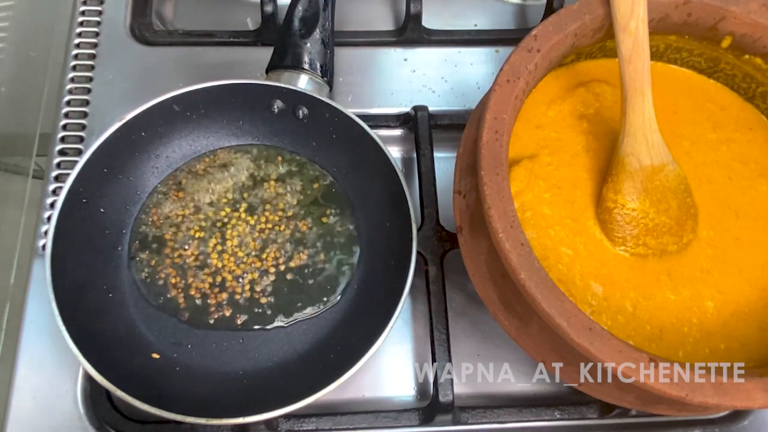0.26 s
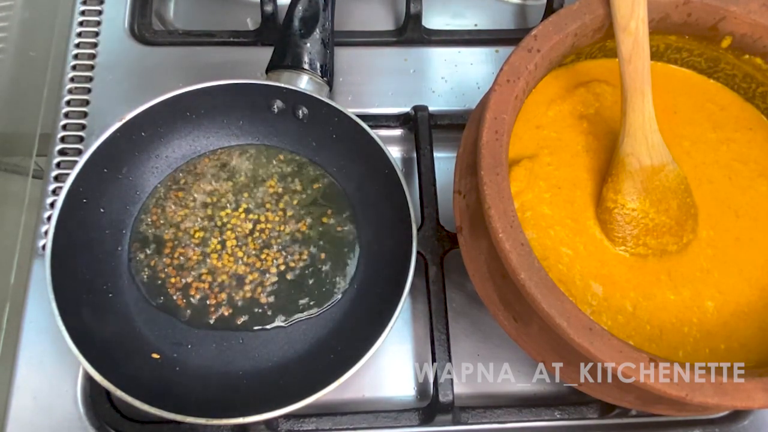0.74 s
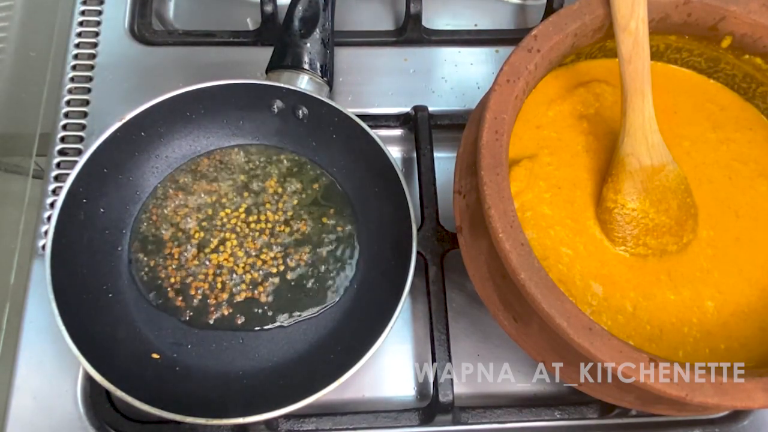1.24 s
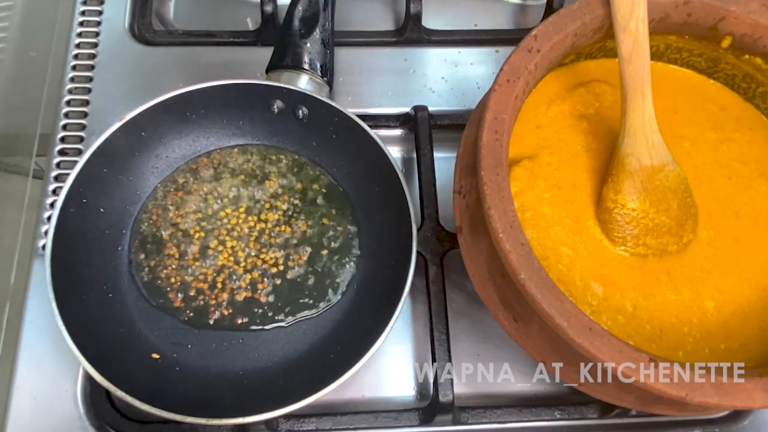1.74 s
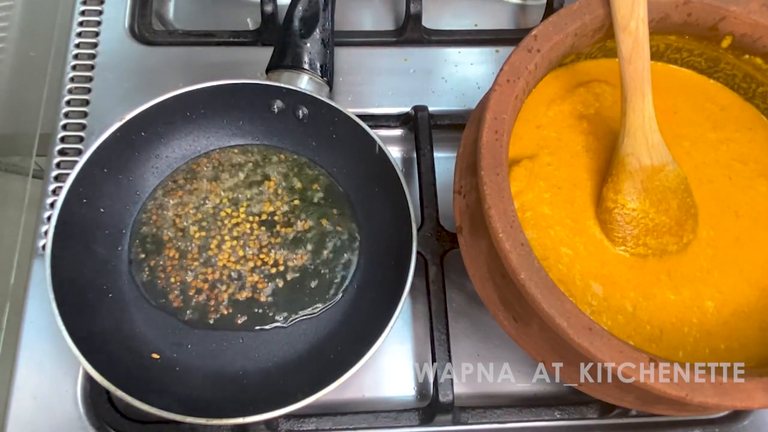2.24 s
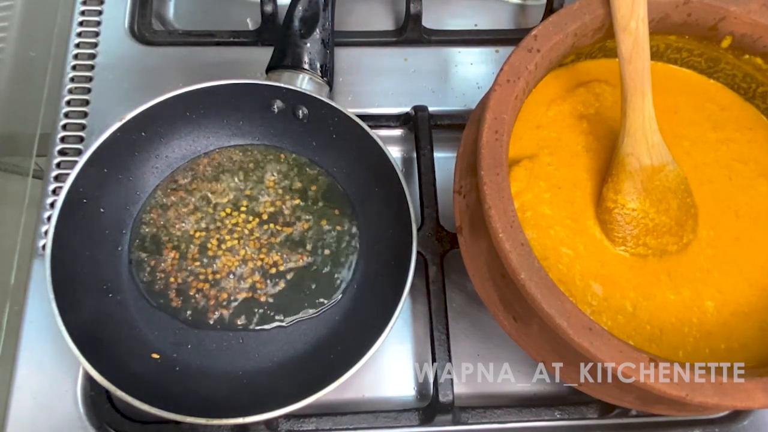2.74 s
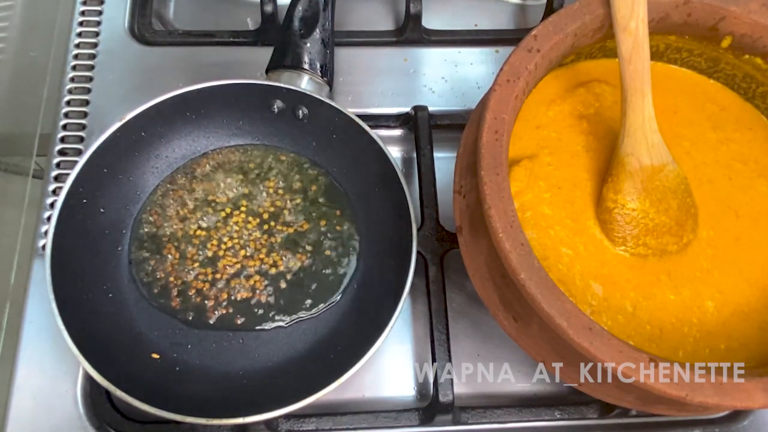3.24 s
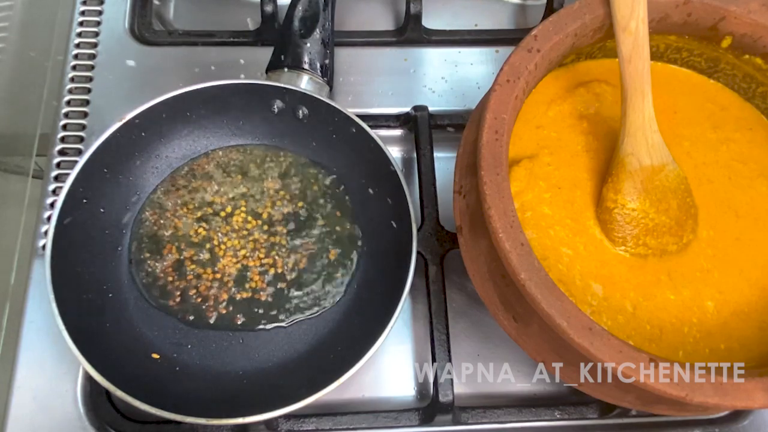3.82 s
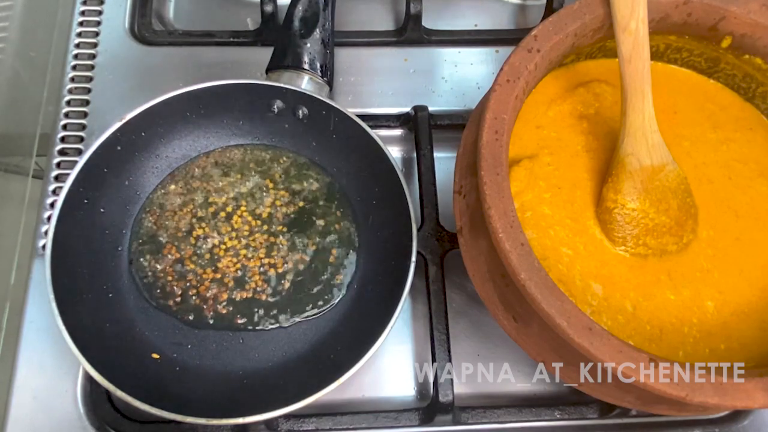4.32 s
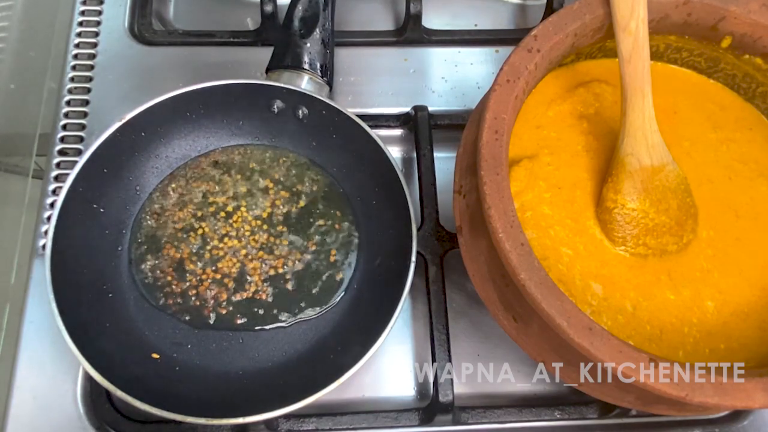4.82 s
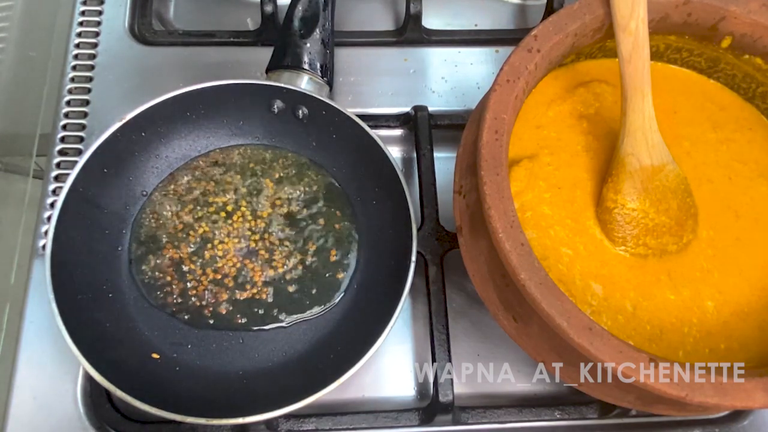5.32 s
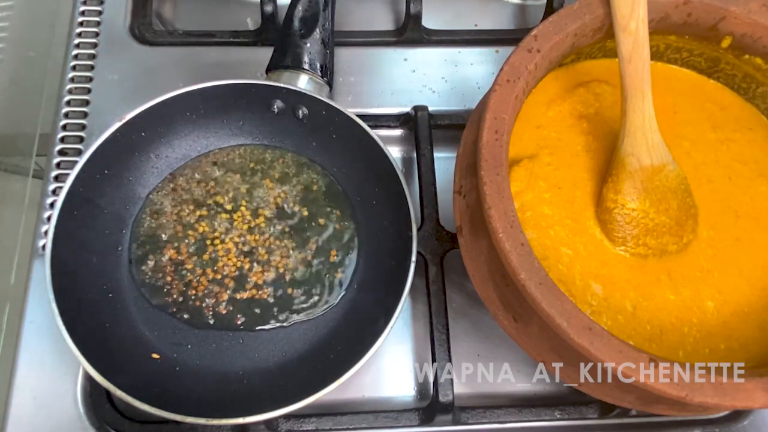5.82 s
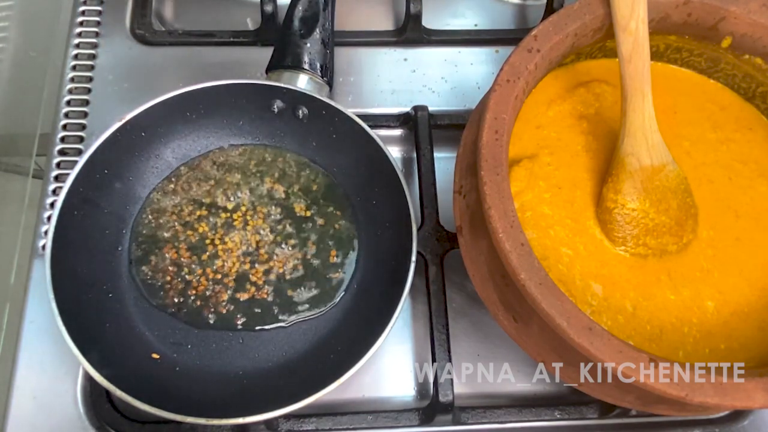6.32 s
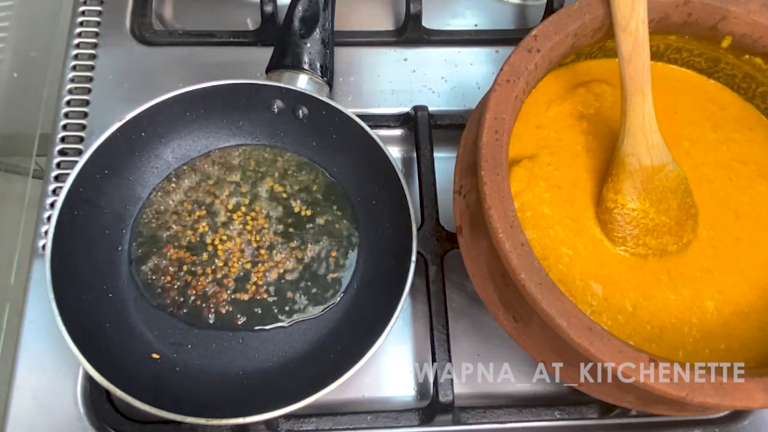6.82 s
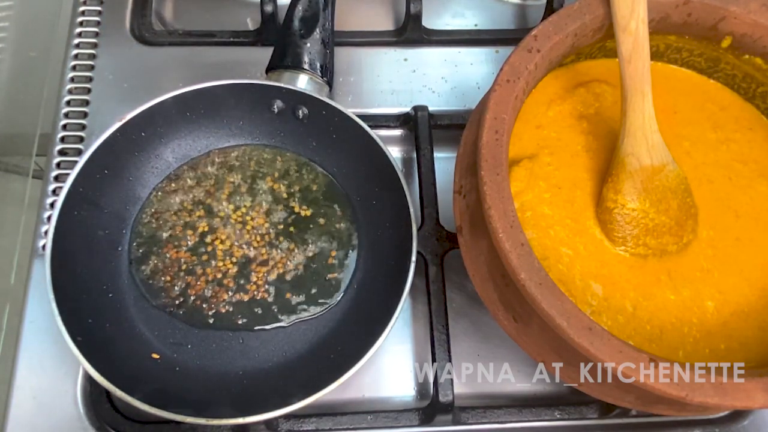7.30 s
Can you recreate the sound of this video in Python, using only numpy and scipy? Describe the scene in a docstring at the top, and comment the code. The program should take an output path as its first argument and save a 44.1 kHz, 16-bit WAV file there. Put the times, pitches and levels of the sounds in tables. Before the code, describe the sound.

Mustard seeds splutter in hot ghee in a small pan, irregular sharp pops and crackles over a fine sizzle and faint gas flame roar.

```python
"""Mustard seeds spluttering in hot ghee

A small frying pan on a gas hob, heard close up through a phone in a kitchen.
Seeds burst with sharp noise cracks that ring the pan's modes; puffs of air are low swings that sag in pitch.
Flung bits land with pitched ticks. The fat sizzles as hiss plus grains, stirred for a moment by larger bursts.
Shaped noise makes the burner's soft roar, and the room adds a short bright tail.
Now and then the low end thins out and comes back."""
import sys
import numpy as np
from scipy import signal
from scipy.fft import rfft, irfft
from scipy.io import wavfile
from scipy.ndimage import uniform_filter1d

SR = 44100
rng = np.random.default_rng(int(sys.argv[2]) if len(sys.argv) > 2 else 0)


def wav_out(sig):
    """Save sig, one row per channel (or a flat mono array), as 16-bit PCM at SR to the path in sys.argv[1]."""
    wavfile.write(sys.argv[1], SR, np.round(np.clip(np.atleast_2d(sig).T, -1, 1) * 32767).astype(np.int16))


N = 333197
TIME = np.arange(N) / SR  # s
HIT = np.arange(int(.04 * SR)) / SR  # clock of one short sound, s
MS = SR / 1000  # samples in a millisecond


# layers of a burst re its crack level, before its brightness tilts them; send to the room
BODY_DB, TOP_DB, POP_ROOM_DB = -7.5, 2, -5


def pops(low_db=-8, lead_s=.0004, dull_db_per_octave=32, air_db=-3, sheen_db=-4):
    """Seed coats split with a crack and ring the pan; returns the near sound and the send to the room."""
    near, far = np.zeros((2, 2, N))
    for s, db, bright_db, pan_db, ring_db in seeds():
        body_db, top_db = BODY_DB - bright_db, TOP_DB + bright_db
        body = crack(2470, 4410, decay_s=0.00034, alike=0.047)
        low = undb(low_db) * crack(846, 2620, decay_s=0.00018, alike=0.083)
        # a slower burst loses its top, and its snap sits lower too
        snap_hz = max(9000 * 2 ** (min(top_db, 0) / dull_db_per_octave), 5600)
        snap = crack(4610, snap_hz, decay_s=0.00057, alike=0.51)
        sheen = crack(9000, 12000, decay_s=.0003, alike=.7, rise_s=.0003, scatter_db=-22)
        air = crack(12500, 16500, decay_s=.0003, alike=.7, rise_s=.0003, scatter_db=-22)
        top = undb(sheen_db) * sheen + undb(air_db) * air
        # the middle of the spectrum favours one microphone; the top reaches both alike
        middle = (low + undb(body_db) * body + snap) * sides(pan_db)
        burst = middle + undb(top_db) * top
        add(near, s - lead_s, undb(db) * burst)
        add(near, s, undb(db + ring_db) * pan_ring())
        add(far, s - lead_s, undb(db + POP_ROOM_DB) * burst)
    return near, far


# larger bursting seeds: (time [s], crack level [dB], brightness [dB], left minus right [dB],
# pan ring re crack [dB]); brightness lifts the top and lowers the body by as much
BURSTS = [(0.234, -17, -0.5, 5, -28), (0.4563, -30.5, -1.5, 8, -23), (0.7646, -14.5, -1, 0, -21),
          (0.8053, -22.5, -1.5, 4, -14), (0.865, -28, 3, 4, -25), (1.0245, -18.5, -2, 2, -28),
          (1.1812, -23.5, 5.5, 6, -21), (1.3019, -29.0, -4.5, 8, -31), (1.355, -24, -8.5, 8, -11),
          (1.4275, -18.5, -7, 8, -11.5), (1.6497, -27.5, -3.5, 6, -19), (1.7512, -19, 3.5, 1, -32),
          (1.7813, -14.5, -1, 6, -25), (1.8885, -18, 1.5, 2, -37), (1.9604, -20.5, -0.5, 2, -15.5),
          (2.0107, -16, 0, 5, -35), (2.0921, -20.5, -0.5, 6, -14), (2.226, -20, 2, 2, -22),
          (2.2564, -21.5, -1, 8, -25), (2.2952, -25, -1.5, 4, -28), (2.5593, -19.5, 1, 11, -11.5),
          (2.6131, -28, -6.5, 4, -13), (2.7314, -22, 1.5, 11, -42), (3.0584, -27, 4, 11, -15),
          (3.436, -24, 2, 5, -22), (3.4906, -22.5, 5, 4, -37), (3.6183, -32, 3, 2, -30),
          (3.629, -26, 6, 2, -34), (3.714, -14.5, 1, -2, -20.5), (3.8801, -20.0, 4.5, 16, -12.5),
          (3.9065, -27, -9.5, 2, -21), (4.1322, -14, -1.5, 0, -16.5), (4.455, -23.5, -8, 5, -22.5),
          (4.8702, -26.5, -3.5, 3, -21), (5.017, -25, 4.5, -4, -23), (5.028, -22, -1, 4, -30),
          (5.1404, -26.5, 0.5, 1, -35), (5.3344, -19, 0.5, 3.5, -34), (5.474, -15.5, 2, 2, -23.5),
          (5.5193, -26, 2, 4, -36), (5.676, -29.5, 1, 5, -38), (5.77, -14.5, 0.5, 8.5, -42),
          (6.0595, -16.5, -11, 5, -19), (6.159, -23, -6.5, 2, -35), (6.211, -30.5, -14.5, 2, -28),
          (6.2274, -16.5, -9, 9, -25), (6.2685, -20.5, -1.5, 13, -27), (6.3037, -29, -12, 8, -23),
          (6.336, -25.5, 1, 1, -33), (6.4188, -26.5, 7, 6, -28), (6.5571, -23, 2.5, 0.5, -30),
          (6.78, -28, -11.5, -1, -17), (7.0018, -19, 4.5, 2, -32), (7.0562, -27.0, 0, 6, -25),
          (7.0801, -28, 3.5, 1, -28), (7.1446, -19, 0, 7, -22)]
# the smallest seeds: rate, mean level, largest scatter either way, pan ring re crack
SMALL_PER_S, SMALL_DB, SMALL_SPREAD_DB, SMALL_RING_DB = 2.2, -41, 4, -15.5


def seeds():
    """Larger seeds burst on cue and the smallest at random times; one row per burst."""
    count = int(SMALL_PER_S * N / SR)
    moment, size, bright, place = rng.random((count, 4)).T
    level = SMALL_DB + SMALL_SPREAD_DB * (2 * size - 1)
    small = [moment * N / SR, level, 6 * bright, 10 * place, np.full(count, SMALL_RING_DB)]
    return np.vstack([BURSTS, np.transpose(small)])


# resonant modes of the pan: (frequency [Hz], level [dB], decay by 60 dB [s])
PAN_MODES = [(684, -6, .13), (1110, -1, .11), (1965, 0, .13), (2751, -15, .1), (4134, -13, .09),
             (4398, -9, .1), (5066, -11, .1)]


def pan_ring(spread_db=2):
    """The pan's modes; each burst sits somewhere else and weights them anew."""
    t = np.arange(SR // 4) / SR
    hz, db, t60 = np.transpose(PAN_MODES)[:, :, None]
    gains = undb(db + spread_db * rng.standard_normal((len(PAN_MODES), 1)))
    phase = rng.uniform(0, 2 * np.pi, (2, len(PAN_MODES), 1))
    decay = np.exp(-np.log(1000) * t / t60)
    return np.sum(gains * decay * np.sin(2 * np.pi * hz * t + phase), axis=1)


def crack(lo_hz, hi_hz, decay_s, alike, rise_s=0.00063, scatter_db=-18, scatter_s=0.0028):
    """A split-second noise burst in one band, trailed by its scatter off the pan wall and hob."""
    rise = (1 - np.exp(-HIT / rise_s)) ** 2
    fall = np.exp(-HIT / decay_s) + undb(scatter_db) * np.exp(-HIT / scatter_s)
    return blow(band(pair(len(HIT), alike) * rise * fall, lo_hz, hi_hz))


# flung seeds and drops landing: (time [s], ring level [dB], ring pitch [Hz], click re ring, before trim [dB])
LANDINGS = [(0.3333, -13, 2730, -5.5), (0.693, -23.5, 2810, -10), (0.849, -26, 2760, -20),
            (0.9055, -18.5, 2880, -0.5), (1.065, -31.5, 2690, -5), (1.1948, -20.5, 2650, 1),
            (1.324, -23.5, 2720, -10), (1.3921, -14.5, 2895, -4.5), (1.477, -15.5, 2810, -28),
            (1.5878, -17.5, 2770, -15), (2.2316, -20.5, 2850, -16), (2.3527, -16.5, 2830, -16),
            (2.5306, -16.5, 2840, -10), (2.915, -22, 2830, -2.5), (3.0688, -19.5, 2830, -12),
            (3.6073, -30, 3340, 0), (3.8898, -20, 2890, -6), (3.9138, -24, 2740, -13),
            (4.2292, -21.5, 2530, -27), (4.2603, -16, 3010, -5.5), (5.2597, -30, 2840, -19),
            (6.4934, -27.5, 3090, -1), (7.4604, -25, 2920, -16)]


def ticks(swell_s=0.0015, upper_ratio=1.213, upper_db=-11, knock_db=-4, lag_s=0.0001, pan_db=5):
    """Small landings: a click, then a damped ring of a few cycles with a weaker partial above."""
    out = np.zeros((2, N))
    t = HIT - np.array([[0], [lag_s]])  # the ring's phase lags on the right
    shape = HIT * np.exp(-HIT / swell_s)
    for s, db, hz, click_db in LANDINGS:
        phase = rng.uniform(0, 2 * np.pi, 2)
        ring = blow(shape * np.sin(2 * np.pi * hz * t + phase[0]))
        partial = blow(shape * np.sin(2 * np.pi * hz * upper_ratio * t + phase[1]))
        knock = undb(knock_db) * crack(2060, 4770, decay_s=0.00057, alike=0.022)
        click = undb(-1.5) * crack(2660, 12300, decay_s=0.0012, alike=0.16)
        click = click + undb(-17.5) * crack(6300, 12500, decay_s=0.0008, alike=1.0)
        landing = ring + undb(upper_db) * partial + knock + undb(click_db) * click
        add(out, s, undb(db) * landing * sides(pan_db))
    return out


# large puffs of steam that blow straight at the microphones: (time [s], level [dB], starting pitch [Hz])
STEAM_PUFFS = [(0.8061, -30.5, 600), (0.8684, -21, 380), (1.782, -26, 410), (3.4377, -29, 626),
               (3.6315, -22, 533), (3.7163, -23, 357), (5.3354, -15, 346), (5.7724, -27.5, 500),
               (6.4209, 5.5, 426), (6.4963, -18.5, 277), (6.511, -26.5, 298)]
# every larger burst also pushes a little air: level re the crack, starting pitch
PUFF_DB, PUFF_HZ = -19, 648


def puffs(sag_cycles=1.4, rise_cycles=0.16, decay_cycles=1.57, wake_db=-26, wake_cycles=7,
          lag_s=0.00017, after_s=0.00092):
    """One push of air or steam swings back ever more slowly, reaching the left microphone first."""
    out = np.zeros((2, N))
    small = [(s + after_s, db + PUFF_DB, PUFF_HZ) for s, db, *_ in BURSTS]
    for s, db, hz in list(STEAM_PUFFS) + small:
        age = hz * np.maximum(HIT - np.array([[0], [lag_s]]), 0)  # in starting cycles
        swing = -np.sin(2 * np.pi * sag_cycles * np.log1p(age / sag_cycles))
        rise = 1 - np.exp(-age / rise_cycles)
        fall = np.exp(-age / decay_cycles) + undb(wake_db) * np.exp(-age / wake_cycles)
        fade = 1 - (HIT / HIT[-1]) ** 2
        add(out, s - lag_s / 2, undb(db) * blow(swing * rise * fall * fade) * sides(6.2))
    return out


# spectrum of the sizzle: (frequency [Hz], relative level [dB per Hz])
FAT_SPECTRUM = [(1800, -8), (2700, 2), (4000, -3), (5200, 0), (8000, 2.5), (11000, 6), (12500, -1.5),
                (14000, 3.5), (15300, 11), (16500, -33)]


def sizzle(per_s=450, spread_db=10, grain_db=-7, hiss_db=0):
    """Countless tiny steam bubbles merge into a hiss; the larger ones stand out as grains."""
    bigness = np.minimum(rng.exponential(size=N), 4)
    sizes = undb(spread_db * bigness) * (rng.random(N) < per_s / SR)
    grains = pair(N, 1.0) * signal.fftconvolve(sizes, np.exp(-HIT / 0.0014))[:N]
    hiss = pair(N, 0.4) * undb(2.6 * walk(40))
    fat = undb(hiss_db) * unit(colour(hiss, FAT_SPECTRUM))
    fat = fat + undb(grain_db) * unit(colour(grains, FAT_SPECTRUM))
    return fat * boil() * sides(1.0)


# the boil without its flares: (time [s], level [dB])
STEADY_BOIL = [(0, -44.5), (0.6, -51.5), (2.0, -46.5), (3.4, -51), (5.6, -48.5), (6.4, -51), (7.56, -50)]
# each larger burst stirs the fat: flare level re the crack, settling time
STIR_DB, SETTLE_S = -37, 0.2


def boil():
    """Strength of the sizzle: the underlying boil plus a flare that settles after each larger burst."""
    kicks = np.zeros(N)
    for s, db, *_ in BURSTS:
        kicks[int(s * SR)] += undb(db + STIR_DB) ** 2
    stirred = signal.lfilter([1], [1, -np.exp(-2 / (SETTLE_S * SR))], kicks)  # power
    steady = undb(np.interp(TIME, *np.transpose(STEADY_BOIL)))
    return np.sqrt(steady ** 2 + stirred)


# course of the flame's low rumble, before its trim and flutter: (time [s], level [dB])
RUMBLE_LEVEL = [(0, -54), (2.2, -53.5), (2.8, -64.5), (3.35, -57.5), (3.9, -60.5), (5.8, -59), (6.3, -60.5),
                (6.9, -64), (7.56, -69)]
# spectra of the rumble, the roar and its upper part: (frequency [Hz], relative level [dB per Hz])
RUMBLE_SPECTRUM = [(20, -41), (45, -1.5), (110, -2.5), (190, 2), (280, -4), (450, -15), (800, -5)]
ROAR_SPECTRUM = [(150, -17), (350, -4.5), (580, -4.5), (820, -7.5), (1080, 9), (1320, -2), (1500, 4.5),
                 (1750, -4.5), (2200, -59)]
UPPER_SPECTRUM = [(1300, -4.5), (1800, -6), (2300, 1), (2800, -14), (4000, -8)]
# the air gap under the pan sings in the flame: (frequency [Hz], width [Hz], level re roar [dB])
GAP_TONE = (687, 8.1, -3.5)


def burner(rumble_db=1, roar_db=-51.5, upper_db=-7):
    """The gas flame flutters and roars as shaped noise, with a narrow-band tone under the pan."""
    low = undb(np.interp(TIME, *np.transpose(RUMBLE_LEVEL)))
    hz, width, tone_db = GAP_TONE
    tone = undb(tone_db) * unit(band(pair(N, 0.022), hz - width / 2, hz + width / 2, order=1))
    flutter = undb(2 * walk(20))
    rumble = unit(colour(pair(N, 0.89), RUMBLE_SPECTRUM)) * undb(rumble_db) * flutter
    roar = unit(colour(pair(N, 0.025), ROAR_SPECTRUM))
    roar = roar + undb(upper_db) * unit(colour(pair(N, 0.048), UPPER_SPECTRUM))
    roar_gain = undb(roar_db + 1.4 * walk(8.6))
    return low * rumble + (roar + tone) * roar_gain * sides(3.1)


# spectrum of the room's tail: (frequency [Hz], relative level [dB per Hz])
ROOM_SPECTRUM = [(200, -32), (900, -7), (2000, 9.5), (3000, 8), (5000, 8), (8000, 6.5), (12000, 0.5),
                 (16000, -34)]
# decay by 60 dB, level of the tail
ROOM_T60_S, ROOM_DB = .34, -10


def kitchen(x, first_s=0.0036):
    """Tiles and hob throw back a short, dense tail, different for each direction and each microphone."""
    t = np.arange(SR // 2) / SR
    fade = np.exp(-np.log(1000) * t / ROOM_T60_S) * np.minimum(t / first_s, 1) ** 2
    out = 0
    for direction in x:
        tail = colour(rng.standard_normal((2, len(t))), ROOM_SPECTRUM) * fade
        tail = tail / np.sqrt(np.sum(tail ** 2, axis=1, keepdims=True))
        out = out + signal.fftconvolve(direction[None], tail, axes=1)[:, :N]
    return undb(ROOM_DB) * out


# the low end thins out and comes back: (start [s], climb of the edge [s], hold [s], recovery [s],
# highest edge [Hz], depth [dB])
LOW_DIPS = [(0.856, 0.073, 0.11, 0.052, 1980, -3.5), (1.29, 0.068, 0.066, 0.29, 330, -20),
            (1.964, 0.24, 0.23, 0.59, 2420, -22.5), (2.544, .05, 0.32, 0.2, 110, -19),
            (3.477, 0.1833, .04, 0.021, 810, -19), (5.54, 0.27, 0.15, .03, 2480, -5.5),
            (6.069, 0.05, 0.38, 0.3, 1760, -4.5), (6.66, 0.16, 0.81, .1, 110, -10)]
# time for a dip to reach its depth; the edge follows this power of how far the climb has gone
DEPTH_RISE_S, EDGE_POWER = 0.022, 0.5


def thin(x, size=512):
    """Each dip is a steep low shelf whose edge climbs, holds, then sinks away as the depth fades."""
    f, t, frames = signal.stft(x, SR, nperseg=size)
    for s, climb_s, hold_s, recovery_s, edge_hz, depth_db in LOW_DIPS:
        times = s + np.cumsum([0, climb_s, hold_s, recovery_s])
        edge = 1 + edge_hz * np.interp(t, times, [0, 1, 1, 0]) ** EDGE_POWER
        onset = np.clip((t - s) / DEPTH_RISE_S, 0, 1)
        depth = depth_db * onset * np.interp(t, times[2:], [1, 0])
        below = 1 / (1 + (f[:, None] / edge) ** 12)
        frames = frames * undb(depth * below)
    return signal.istft(frames, SR, nperseg=size)[1][:, :N]


def undb(db):
    """Decibels to gain."""
    return 10 ** (np.asarray(db) / 20)


def unit(x):
    """Scale to rms 1."""
    return x / np.sqrt(np.mean(x ** 2))


def blow(x):
    """Scale each channel of a short sound to the energy of one millisecond at rms 1."""
    return x * np.sqrt(MS / np.sum(x ** 2, axis=-1, keepdims=True))


def band(x, lo_hz, hi_hz, order=3):
    """Causal band-pass."""
    edges = [lo_hz, min(hi_hz, SR / 2 - 1000)]
    return signal.sosfilt(signal.butter(order, edges, "band", fs=SR, output="sos"), x)


def colour(x, points):
    """Shape a sound by a spectrum of (Hz, dB) points, falling 12 dB per octave more beyond its ends."""
    hz, db = np.transpose(points)
    f = np.maximum(np.fft.rfftfreq(x.shape[-1], 1 / SR), 1)
    beyond = np.minimum(f / hz[0], 1) ** 2 * np.minimum(hz[-1] / f, 1) ** 2
    gain = beyond * undb(np.interp(np.log(f), np.log(hz), db))
    return irfft(rfft(x) * gain, x.shape[-1])


def pair(size, alike):
    """Noise at the two microphones, with the given correlation."""
    mid, side = rng.standard_normal((2, size))
    alike = np.clip(alike, 0, 1)
    return np.sqrt((1 + alike) / 2) * mid + np.sqrt((1 - alike) / 2) * side * np.array([[1], [-1]])


def walk(rate):
    """Random levels held 1 / rate s, slewed twice and scaled to rms 1."""
    k = int(SR / rate)
    steps = np.repeat(rng.standard_normal(N // k + 1), k)
    return unit(uniform_filter1d(uniform_filter1d(steps, k), k)[:N])


def sides(pan_db):
    """Left and right gains of equal total power, from left minus right in dB."""
    return unit(undb(np.array([[pan_db], [-pan_db]]) / 2))


def add(out, s, sound):
    """Mix a sound in at time s."""
    i = max(int(s * SR), 0)
    out[:, i:i + sound.shape[-1]] += sound[..., :N - i]


def scene(tick_room_db=-9):
    """Pops and ticks excite the room; puffs, sizzle and flame stay dry, and the dips thin the whole mix."""
    near, far = pops()
    landings = ticks()
    room = kitchen(far + undb(tick_room_db) * landings)
    return thin(near + landings + puffs() + room + sizzle() + burner())


def record(dry):
    """The phone clips peaks at full scale and cuts the top with a steep low-pass at 16400 Hz."""
    low_pass = signal.ellip(8, .2, 70, 16400, fs=SR, output="sos")
    return signal.sosfilt(low_pass, np.clip(dry, -1, 1))


dry = scene()
out = record(dry)
wav_out(out)
```